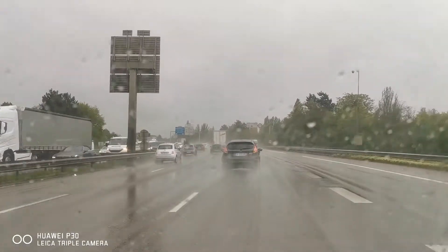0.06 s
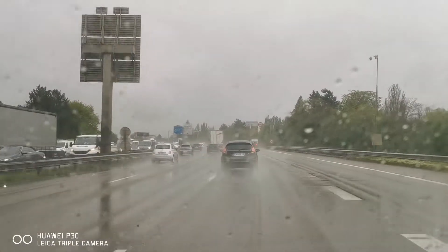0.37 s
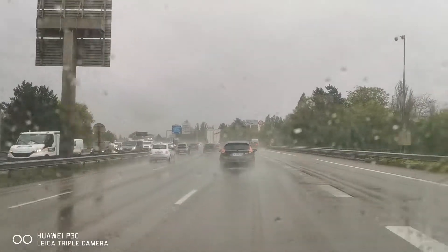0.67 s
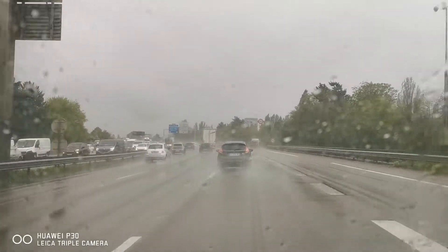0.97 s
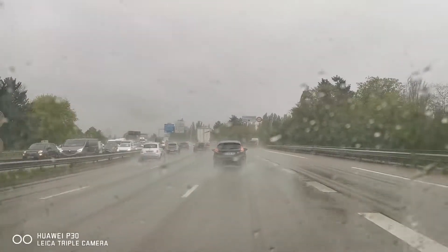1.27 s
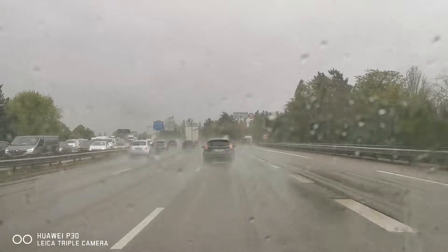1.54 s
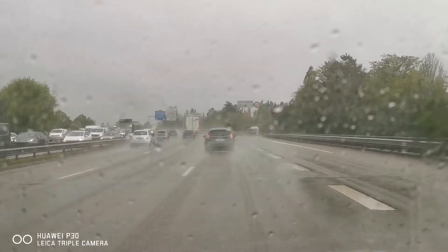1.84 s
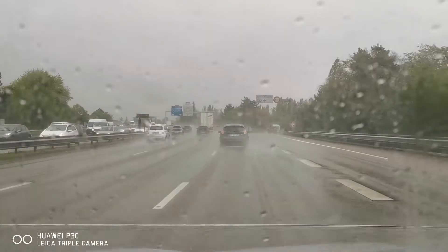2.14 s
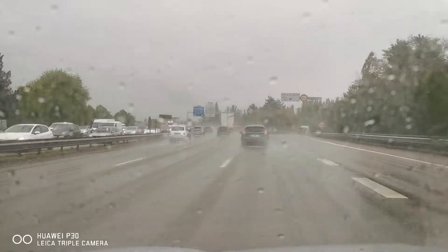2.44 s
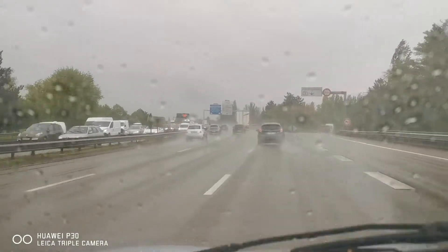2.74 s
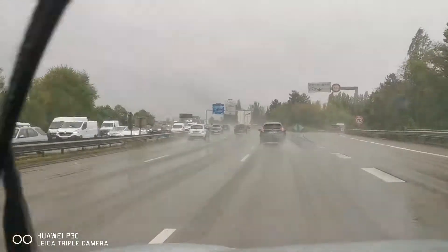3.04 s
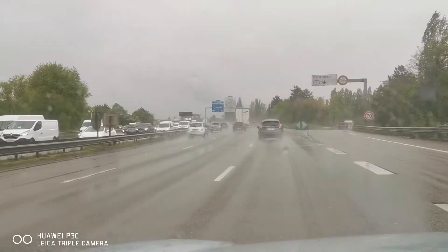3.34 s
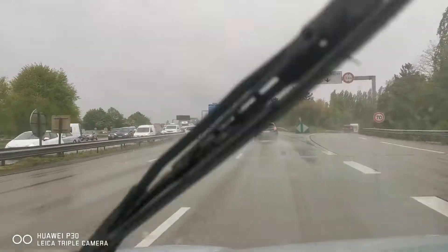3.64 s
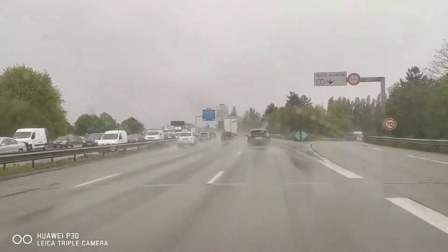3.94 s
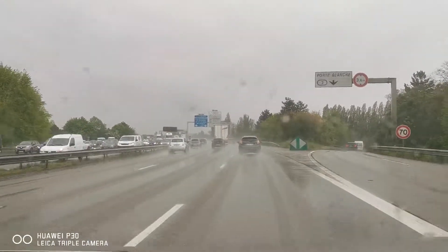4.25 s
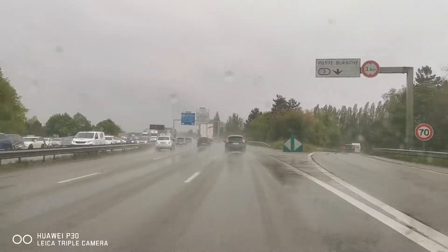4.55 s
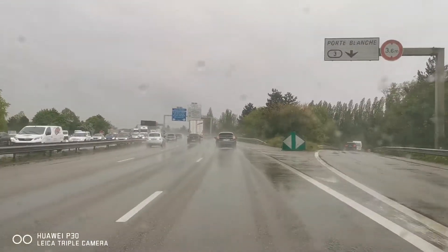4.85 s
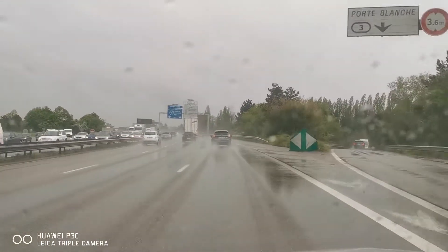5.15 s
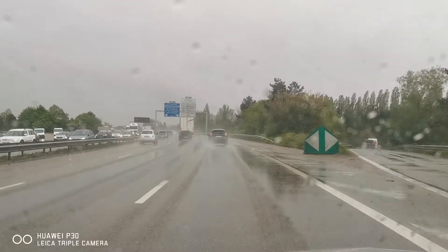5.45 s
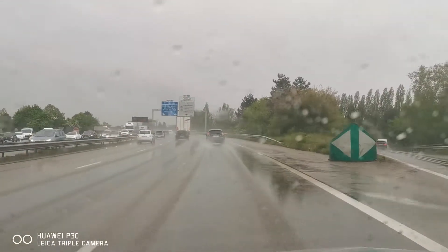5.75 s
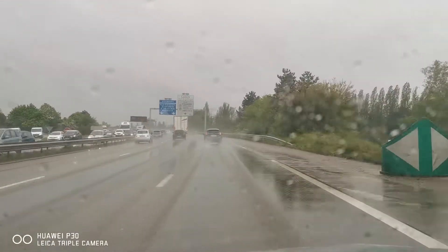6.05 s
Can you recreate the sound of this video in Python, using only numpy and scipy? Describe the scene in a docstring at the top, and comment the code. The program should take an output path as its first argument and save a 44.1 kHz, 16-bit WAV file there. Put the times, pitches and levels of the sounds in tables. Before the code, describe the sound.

Steady tyre rumble inside a car on a wet highway, with rain ticking on the windscreen and two thumps over road joints.

```python
"""Wet highway from inside a car

Tyres rumble and roar through the cabin's resonances over a low engine hum and a faint gear whine.
The wheels thump over two road joints, setting the body and the cabin air ringing. Rain ticks on the
windscreen, spray washes along the left side, and the wiper rubs quietly up and back once."""
import sys
import numpy as np
from scipy import signal
from scipy.fft import rfft, irfft, next_fast_len
from scipy.io import wavfile
from scipy.ndimage import uniform_filter1d, map_coordinates

SR = 44100
rng = np.random.default_rng(int(sys.argv[2]) if len(sys.argv) > 2 else 0)


def put_to_file(sound):
    """Save the sound as 16-bit audio at rate SR, in the file named by the first command-line argument."""
    columns = np.atleast_2d(sound).T  # one column per channel
    safe = np.clip(columns, -1, 1)
    whole_steps = np.round(safe * 32767)
    wavfile.write(sys.argv[1], SR, whole_steps.astype(np.int16))


N = 269451
TIME = np.arange(N) / SR

# Road surface faders: t/s, rumble from unevenness/dB, growl from coarse asphalt/dB
SURFACE = [(0, -30.5, -69), (.8, -34, -54), (1.35, -31.5, -65), (1.7, -33, -57), (2.4, -31.5, -56),
           (3.12, -28, -55.5), (3.5, -35, -48), (3.85, -31.5, -53), (4.25, -30.5, -46.5),
           (4.85, -31.5, -50), (5.3, -33, -45), (6.11, -31, -47.5)]
# Tyre noise EQs, deep rumble, broad roar and low-mid growl: f/Hz, level/dB
RUMBLE_EQ = [(8, -62), (20, 3.5), (40, 0), (70, -2.5), (120, -4), (170, -6.5), (220, -11), (320, -21.5),
             (600, -40), (2000, -91)]
ROAR_EQ = [(60, -13), (180, -1.5), (260, -5.5), (350, -1), (450, 1.5), (600, -5), (800, -9), (1100, -9),
           (1600, -16.5), (2200, -16), (4000, -20.5), (6000, -25.5), (15000, -58)]
GROWL_EQ = [(120, -22), (210, -1.5), (260, 5.5), (350, 0), (430, -7), (560, -2.5), (700, -13), (900, -41),
            (2000, -36)]
# Cabin air and panel resonances: f/Hz, width/Hz, peak against the plain noise/dB
CABIN_PEAKS = [(27.2, 7.2, 11.5), (53.5, 27, 6), (105.9, 17.3, 2.5), (118.4, 10.7, 10), (153.3, 12.6, 1.5),
               (180.8, 11.7, 3), (232.3, 54, -1.5), (261, 12, -1.5), (300, 28.5, 3), (349, 26, 6.5),
               (400, 22, -4), (815, 51, -3), (1110, 1200, -18)]

def road():
    """Asphalt rumbles and the tyres roar, growling on coarser stretches; it all rings in the cabin."""
    def cabin(f):
        return 1 + sum(amp(db) * np.abs(f * width / (hz * hz - f * f + 1j * f * width)) ** 2
                       for hz, width, db in CABIN_PEAKS)
    rumble_db, growl_db = curves(SURFACE)
    roar = amp(-47.5 + 0.9 * wobble(8.3)) * rush(ROAR_EQ)
    growl = amp(growl_db) * rush(GROWL_EQ)
    rumble = amp(rumble_db + 0.5 * wobble(2.76)) * rush(RUMBLE_EQ)
    return filtered(rumble + roar + growl, cabin)


# Front then rear axle at each joint, and a last rebound: t/s, boom/dB, heave/dB, knock/dB, push/s
WHEEL_HITS = [(2.525, -27.5, -21.5, -26.5, 0.032), (2.617, -4.5, -15, -24, 0.059),
              (4.592, -16.5, -24, -26.5, 0.011), (4.7, -16, -9, -19.5, 0.031),
              (4.773, -12.5, -36, -52, 0.023)]
# Boom of the cabin air and heave of the body: f/Hz, level/dB, t60/s
BOOM_MODES = [(79, -5.5, 0.14), (121.5, 1.5, 0.2), (150, -14, 0.062), (166.2, -9, 0.034)]
HEAVE_MODES = [(37, 1.4, 0.27), (64.8, 1, 0.3)]
# Dull tyre knock: f/Hz, level/dB
KNOCK_EQ = [(40, -21), (120, 3.5), (240, -1.5), (290, -12.5), (355, -6), (410, -19.5), (560, -21),
            (900, -31.5), (2500, -57)]

def joints(knock_t60_s=0.35):
    """A wheel hits a joint: the tyre knocks, the body heaves and the air booms, then all ring out."""
    def ring(modes, decay_s):
        return sum(amp(db - 60 * decay_s / t60) * np.sin(2 * np.pi * hz * t) for hz, db, t60 in modes)
    out, t = np.zeros((2, N)), np.arange(SR // 2) / SR
    thud = rush(KNOCK_EQ)
    for s, boom_db, heave_db, knock_db, push_s in WHEEL_HITS:
        attack = 1 - np.exp(-(t / (0.58 * push_s)) ** 2)
        decay_s = np.maximum(t - push_s, 0)
        boom = amp(boom_db) * ring(BOOM_MODES, decay_s)
        heave = amp(heave_db) * ring(HEAVE_MODES, decay_s)
        knock = amp(knock_db - 60 * decay_s / knock_t60_s) * thud[:, round(s * SR):][:, :len(t)]
        add(out, s, attack * (boom + heave + knock))
    return out


FIRING_HZ = 78.33 - 0.56 * TIME  # the car slows a little
# Engine load, eased off around the first joint: t/s, level/dB
ENGINE_LOAD = [(0, -30), (1, -26.5), (3, -30.5), (4, -24.5), (5, -33), (6.11, -28)]
# Harmonics of the hum: multiple of the firing rate, level/dB
ENGINE_ORDERS = [(1, -3), (2, -12.5), (3, -16)]

def engine():
    """The engine hums at a few low orders of its firing rate, louder under load."""
    load_db, = curves(ENGINE_LOAD)
    phase = 2 * np.pi * np.cumsum(FIRING_HZ + 0.18 * wobble(5.5)) / SR
    return np.sqrt(2) * sum(amp(load_db + db + 0.87 * wobble(4.44)) * np.sin(order * phase)
                            for order, db in ENGINE_ORDERS)


# Big, featured drops on the glass: t/s, level/dB, brightness/dB, left minus right/dB
BIG_DROPS = [(.155, -26.5, -14, 0), (.678, -24.5, 3, 5), (.939, -23, 0, 0), (.986, -26, 11, 6),
             (1.176, -21, -5.5, 3), (1.806, -23, 0, 1), (2.007, -21, 8, 7), (2.065, -24.5, 7, 8),
             (2.214, -19.5, -11.5, 0), (2.746, -19, 5, 2), (2.857, -28, -10, -3), (3.19, -20.5, 2, 3),
             (3.2635, -17, -0.5, -6), (3.3325, -12, 16, 3), (3.5, -22, 10, 0), (3.625, -26, -12.5, -1),
             (3.828, -20.5, -4, 2), (4.076, -28, -17, -4), (4.227, -28, 5, 4), (4.525, -18.5, -1.5, -3),
             (4.726, -15.5, 4, -2), (5.075, -25, -3, -3), (5.257, -24, -3, -7), (5.312, -18.5, -1, -5),
             (5.34, -31, -3, -6)]

def drops(stray_count=24):
    """Single drops: a bright snap of water, and a duller pat that rings in the glass."""
    def hit(eq, tail_db):
        sound = coloured(tick(tail_db), eq)
        return sound / np.linalg.norm(sound, axis=1, keepdims=True)
    out = np.zeros((2, N))
    stray_times = rng.random(stray_count) * N / SR  # smaller drops at random moments
    stray_settings = rng.normal([-28.5, 0, 0], [2.5, 6.5, 4.5], (stray_count, 3))
    strays = np.column_stack([stray_times, stray_settings])
    pat_eq = [(900, -22), (2000, -3), (2600, 0), (3800, -2), (6000, -16)]
    for s, db, bright_db, pan_db in [*BIG_DROPS, *strays]:
        top_db = bright_db - 2
        snap_eq = [(1500, -49), (3500, -20), (5000, 3), (7000, -3), (10000, top_db), (15500, top_db - 3)]
        snap = hit(snap_eq, tail_db=9)
        pat = amp(-5 - 0.89 * bright_db) * hit(pat_eq, tail_db=7)
        add(out, s, amp([[db + pan_db / 2], [db - pan_db / 2]]) * (snap + pat))
    return out


# Fader for the rain bed on the windscreen: t/s, level/dB
RAIN_STRENGTH = [(0, -56.5), (.13, -57), (.3, -59), (.75, -59), (.92, -58), (1.3, -59.5), (2.4, -58),
                 (2.75, -59.5), (3.02, -61.5), (3.85, -57), (4.15, -59), (4.48, -56), (4.88, -59),
                 (5.1, -55.5), (5.4, -53), (5.55, -57), (5.85, -56.5), (6.11, -54.5)]
# Fine patter and crisp splashes: f/Hz, level/dB
PATTER_EQ = [(300, -53), (1000, 0.5), (1700, -4.5), (2600, 1), (3600, 0.5), (4700, -4.5), (6000, -5),
             (9000, -8), (12000, -7.5), (15500, -10)]
SPLASH_EQ = [(500, -23), (2000, -21.5), (4500, 6.5), (7000, -2.5), (11000, 0.5), (15500, -6)]

def drizzle(bare_glass_db=3, clearing_s=0.17):
    """Fine drops merge into a patter; splashes come in flurries, harder once the water film is wiped."""
    rain_db, = curves(RAIN_STRENGTH)
    mid_upstroke_s = WIPER_STROKES[0][0] + STROKE_S / 2
    wiped = np.clip((TIME - mid_upstroke_s) / clearing_s, 0, 1)
    splash_db = rain_db.mean() + 0.9 * (rain_db - rain_db.mean()) - 3.5 + bare_glass_db * wiped
    fine, crisp = shower(per_second=2400, spread_db=9), shower(per_second=130, spread_db=18)
    flurry = 1.1 * wobble(22)
    patter = amp(rain_db + 4 + 1.6 * flurry) * unit(coloured(fine, PATTER_EQ))
    splashes = amp(splash_db + flurry) * unit(coloured(crisp, SPLASH_EQ))
    return patter + splashes


# Sheets of spray landing on the glass: t/s, level/dB, hold/s
SPRAY_SHEETS = [(1.867, -44, 0.031), (2.148, -51, .05), (2.277, -49, .08)]
# Hissing wash and airy mist: f/Hz, level/dB
WASH_EQ = [(400, -31), (1200, 2.5), (1700, -0.5), (2400, 5), (3600, -5), (5500, -29), (9000, -7.5),
           (15000, -25)]
MIST_EQ = [(2000, -21), (6000, -2), (9000, -3), (13000, 4), (15500, 8)]

def spray():
    """Water thrown off the road washes along the left side; sheets of it land as a grainy mist."""
    flow = amp(-51.5) * swell(start_s=1.86, attack_s=0.37, hold_s=0.34, release_s=0.18)
    sheets = sum(amp(db) * swell(s, 0.026, hold_s, 0.13) for s, db, hold_s in SPRAY_SHEETS)
    surge = np.hypot(flow, amp(-10) * sheets)  # each sheet brings some wash with it
    wash = surge * amp(1.46 * wobble(36.34)) * rush(WASH_EQ)
    mist = sheets * unit(coloured(shower(per_second=1100, spread_db=5.7), MIST_EQ))
    return wash * amp([[1.5], [-11]]) + mist * amp([[0], [-8]])


STROKE_S = 0.46
# Wiper cues, up then back: t/s, level/dB
WIPER_STROKES = [(2.7, -51.5), (3.25, -60)]
# Soft rub of the blade: f/Hz, level/dB
RUBBER_EQ = [(200, -26), (600, 5), (1100, -1), (2000, -21), (6000, -42)]

def wiper():
    """Wet rubber slides up the glass, pauses and slides back; it is loudest where it is fastest."""
    speed = lambda s: np.sin(np.pi * np.clip((TIME - s) / STROKE_S, 0, 1))
    return sum(amp(db) * speed(s) for s, db in WIPER_STROKES) * rush(RUBBER_EQ)


def gear_whine(mesh_ratio=8.35, hold_s=0.85, fade_db_per_s=12):
    """Meshing gears sing a thin, unsteady tone that follows the engine and fades as the driver eases off."""
    db = -58 - fade_db_per_s * np.maximum(TIME - hold_s, 0) + 2.4 * wobble(14)
    hz = mesh_ratio * FIRING_HZ + 4 * wobble(30.7)
    return amp(db) * np.sin(2 * np.pi * np.cumsum(hz) / SR)


def tick(tail_db=0):
    """One drop: a sharp crack, a short ring of the glass, then the cabin's reflections."""
    t = np.arange(SR // 8) / SR
    crack = amp(-60 * t / .002)
    tail = amp(-9 - 60 * t / .018) + amp(-19 - 60 * t / .08)
    return (crack + amp(tail_db) * tail) * rng.standard_normal((2, len(t)))


def shower(per_second, spread_db, patches=10):
    """Drops of uneven size land at random on several patches of the glass."""
    out = np.zeros((2, N))
    per_patch = int(per_second * N / SR / patches)
    for _ in range(patches):
        when, size = rng.random((2, 2000))[:, :per_patch]
        hits = np.bincount((when * N).astype(int), amp(spread_db * size ** 2), N)
        out += signal.oaconvolve(hits[None], tick(), axes=1)[:, :N]
    return out


# Stereo image of the noise beds: f/Hz, left-right correlation
STEREO_IMAGE = [(30, 0.96), (160, 0.97), (270, 0.69), (450, 0.62), (740, 0.23), (1200, -0.13),
                (2500, -0.13)]

def rush(eq):
    """Stereo noise of rms 1: centred in the bass, wide in the treble."""
    def mid_side(hz):
        angle = np.arccos(np.clip(along(STEREO_IMAGE, hz), -1, 1)) / 2
        return amp(along(eq, hz)) * [np.cos(angle), np.sin(angle)]
    mid, side = filtered(rng.standard_normal((2, N)), mid_side)
    return unit(np.array([mid + side, mid - side]))


def amp(db):
    """Decibels to gain."""
    return 10 ** (np.asarray(db) / 20)


def unit(x):
    """Scale to rms 1."""
    return x / np.sqrt(np.mean(x ** 2) + 1e-20)


def along(points, hz):
    """Read a curve on a log frequency axis."""
    freqs, values = np.transpose(points)
    return np.interp(np.log(hz + 1), np.log(freqs + 1), values)


def curves(rows):
    """One fader curve for each column after the time."""
    times, *columns = np.transpose(rows)
    return [np.interp(TIME, times, column) for column in columns]


def wobble(rate):
    """A smooth random curve, rate knots a second."""
    return map_coordinates(rng.standard_normal(256), [TIME * rate], mode="wrap")


def swell(start_s, attack_s, hold_s, release_s):
    """An envelope that rises, holds and falls back to silence."""
    return np.interp(TIME, start_s + np.cumsum([0, attack_s, hold_s, release_s]), [0, 1, 1, 0])


def filtered(x, response):
    """Apply a gain that depends on frequency."""
    n = x.shape[-1]
    padded = next_fast_len(n + 8192)
    return irfft(rfft(x, padded) * response(np.fft.rfftfreq(padded, 1 / SR)), padded)[..., :n]


def coloured(x, eq, size=1024):
    """Minimum-phase EQ, so that ticks keep their sharp fronts."""
    cepstrum = irfft(np.log(amp(along(eq, np.fft.rfftfreq(size, 1 / SR)))))
    cepstrum[1:size // 2] *= 2
    cepstrum[size // 2 + 1:] = 0
    kernel = irfft(np.exp(rfft(cepstrum)))
    return signal.oaconvolve(x, kernel[None], axes=1)[:, :x.shape[1]]


def add(track, s, sound):
    """Mix a sound in at time s."""
    part = track[:, round(s * SR):][:, :sound.shape[-1]]
    part += sound[..., :part.shape[1]]


def gain_control(x, threshold_db=-20, slope=0.42, release_s=0.19):
    """Loud thumps duck the gain at once; it creeps back afterwards."""
    power = np.abs(uniform_filter1d(np.mean(x ** 2, axis=0), SR // 40))
    excess_db = np.maximum(10 * np.log10(power + 1e-12) - threshold_db, 0)
    recovery = np.exp(-TIME / release_s)
    held_db = np.maximum.accumulate(excess_db / recovery) * recovery
    return x * amp(-slope * held_db)


def scene():
    """The full mix, heard from behind the windscreen."""
    return road() + engine() + gear_whine() + joints() + drizzle() + drops() + spray() + wiper()


# Colour of each microphone port: f/Hz, level/dB
LEFT_EQ = [(30, -3.66), (150, 0.5), (330, 1), (1000, 5.5), (1800, 6.5), (3700, 6), (5000, 5), (6000, 1),
           (7500, 0), (9000, 7), (10000, 1), (10700, 5), (13000, -1), (15500, -7.5)]
RIGHT_EQ = [(30, -5.5), (150, -1.5), (330, -3), (1000, 2), (1800, 6.5), (3700, 0.5), (5100, 6),
            (5700, -3.5), (7000, 7), (7800, 3.5), (8800, -11), (11500, -8.5), (15500, -12)]

def record(dry, top_hz=15800):
    """Each microphone port adds its colour; then gain control and a hard high cut."""
    ports = filtered(dry, lambda hz: amp([along(LEFT_EQ, hz), along(RIGHT_EQ, hz)]))
    return filtered(gain_control(ports), lambda hz: hz < top_hz)


dry = scene()
out = record(dry)
put_to_file(out)
```